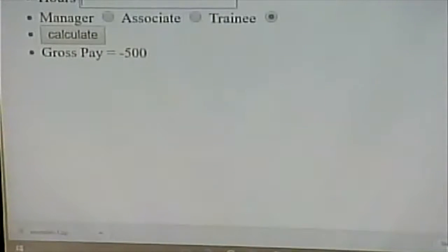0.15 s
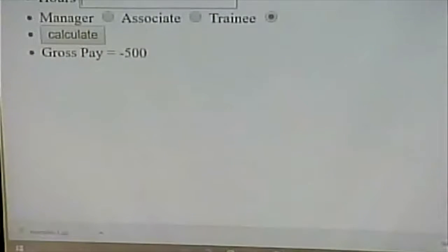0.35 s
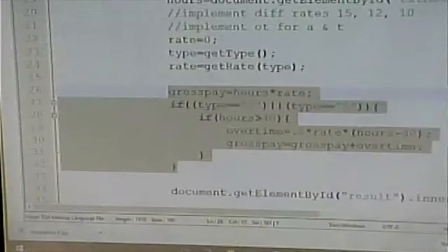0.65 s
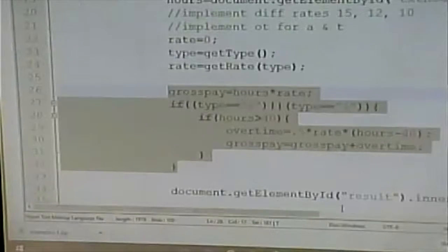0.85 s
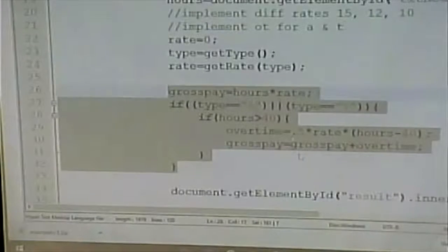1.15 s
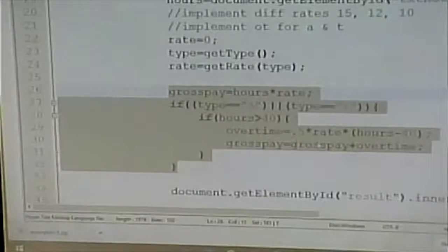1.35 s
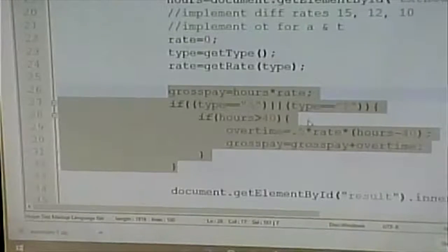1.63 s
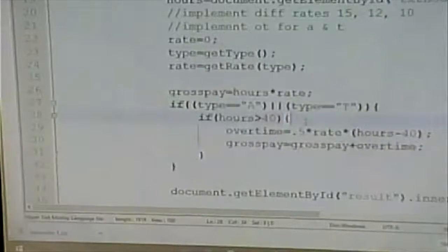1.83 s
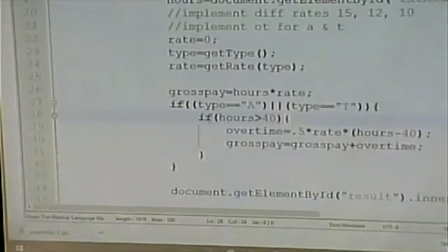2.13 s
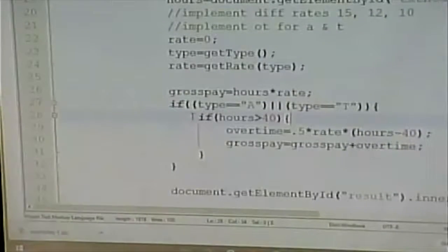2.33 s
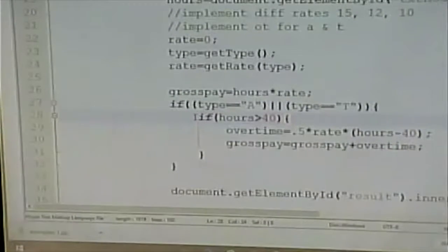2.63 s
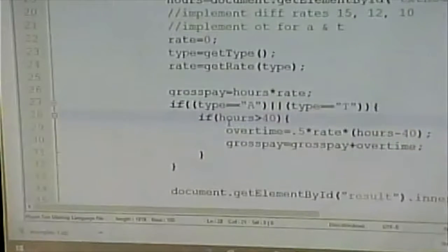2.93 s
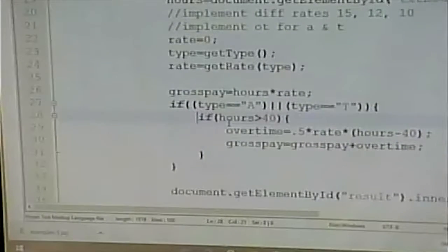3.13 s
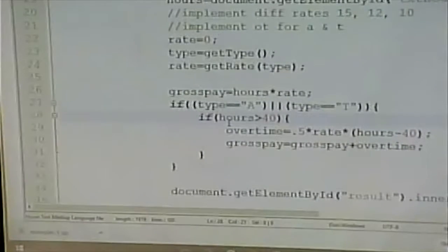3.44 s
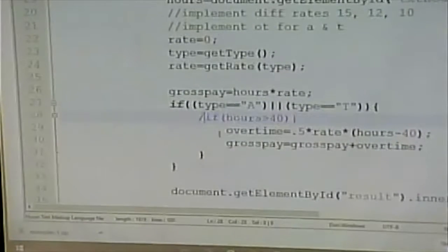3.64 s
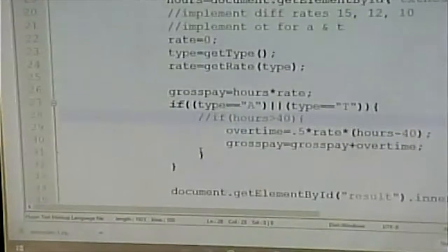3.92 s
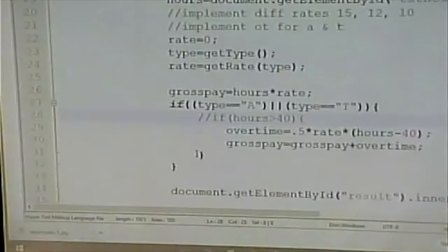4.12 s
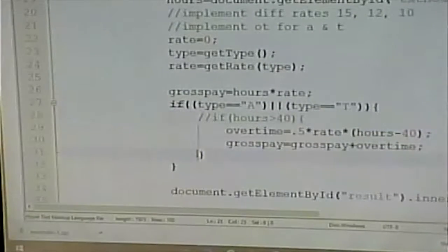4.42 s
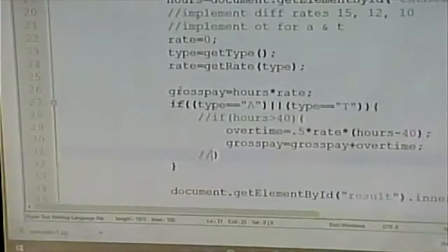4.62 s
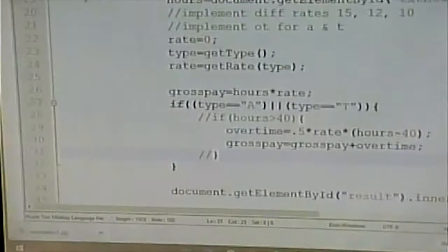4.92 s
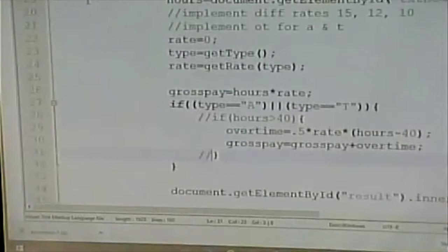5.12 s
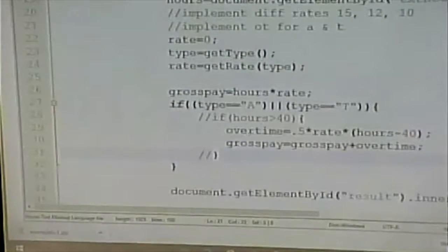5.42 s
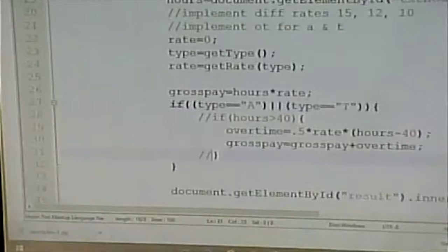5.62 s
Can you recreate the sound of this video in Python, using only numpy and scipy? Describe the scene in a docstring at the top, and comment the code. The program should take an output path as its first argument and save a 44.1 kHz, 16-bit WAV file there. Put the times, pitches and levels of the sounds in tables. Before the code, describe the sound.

Close, almost mono pickup at a desk in a small room with quiet fan noise and faint mains hum. Light knocks and separate mouse press-and-release clicks occupy the first half, with faint skin friction throughout. After a tiny rising squeak, loose plastic keys are tapped in a short burst, the mouse clicks again, and a second burst finishes with a hard, bright key hit.

```python
"""Someone works at a desk in a quiet room. Throughout, a hand slides over the desk (grainy friction noise)
under fan hiss, mains hum and microphone noise (shaped noise, phase-wandering tones). The hand bumps the desk
from the start and the mouse clicks now and then (struck modes); near 3 s a slide ends in a faint squeak (a
rising tone). Two bursts of key taps follow (struck modes with bounces and a loose rattle), the mouse clicking
once more between them. Near walls throw every tap, bump and click back before the room rings out."""
import sys
import numpy as np
from scipy import signal
from scipy.fft import rfft, irfft
from scipy.io import wavfile
from scipy.ndimage import uniform_filter1d

SR = 44100
rng = np.random.default_rng(int(sys.argv[2]) if len(sys.argv) > 2 else 0)


def put_to_file(sound):
    """Save the sound as 16-bit audio at rate SR, in the file named by the first command-line argument."""
    columns = np.atleast_2d(sound).T  # one column per channel
    safe = np.clip(columns, -1, 1)
    whole_steps = np.round(safe * 32767)
    wavfile.write(sys.argv[1], SR, whole_steps.astype(np.int16))


N = 254236  # samples


def gain_of(db):
    """Level law: a level in decibels becomes an amplitude factor."""
    return 10 ** (np.asarray(db) / 20)


def evened(x):
    """Normalisation to a root-mean-square amplitude of 1."""
    return x / np.sqrt(np.mean(x ** 2) + 1e-20)


def read(points, hz):
    """Interpolation of a table along a logarithmic frequency axis."""
    f, value = np.transpose(points)
    return np.interp(np.log(hz + 1), np.log(f + 1), value)


def add(mix, s, sound):
    """Superposition: a sound starting at s seconds adds to the mix."""
    part = mix[round(s * SR):][:len(sound)]
    part += sound[:len(part)]


def hiss(colour, patchy_db):
    """Shaped random noise: a spectral envelope with patches drifting in time and frequency, rms 1."""
    frames, hz = N // 512 + 5, np.fft.rfftfreq(2048, 1 / SR)
    real, imaginary, patches = rng.standard_normal((frames, 1025, 3)).T
    patches = uniform_filter1d(patches, size=30, axis=0)  # along frequency
    patches = evened(uniform_filter1d(patches, size=6, axis=1))  # along time
    envelope = gain_of(read(colour, hz)[:, None] + patchy_db * patches)
    noise = signal.istft((real + 1j * imaginary) * envelope, nperseg=2048, noverlap=1536)[1]
    return evened(noise[:N])


# Level of skin and mouse feet sliding over desk and keys. Each row: time in seconds, rms level in dB.
SLIDE_LEVEL = [(0.0, -57.5), (1.64, -54.5), (1.76, -52), (1.94, -57), (2.23, -56), (2.84, -53),
               (3.08, -58.5), (3.61, -54), (3.99, -58), (4.23, -59), (4.6, -49.5), (4.76, -58.5),
               (5.2, -56), (5.76, -59.5)]
# Spectral envelope of the friction. Each row: frequency in Hz, relative density in dB per Hz.
SLIDE_COLOUR = [(410, -56), (700, -17), (814, -19), (845, -22), (1090, -21), (1540, -10.5), (2010, -14.5),
                (4650, 0.5), (6850, -17.5), (9260, -17), (14000, -28)]


def slide():
    """Stick-slip friction: fine noise made grainy by random catches of the skin."""
    t = np.arange(N) / SR
    caught = rng.random(N) < 120. / SR  # about 120 catches a second
    catches = gain_of(2.0 * np.minimum(rng.exponential(1, N), 3.)) * caught
    catch_decay = np.exp(-np.arange(600) / 44.0)  # time constant 44 samples, about 1 ms
    grain = 1.4 + 0.17 * evened(signal.oaconvolve(catches, catch_decay)[:N])
    level_db = np.interp(t, *np.transpose(SLIDE_LEVEL))
    return gain_of(level_db) * evened(grain * hiss(SLIDE_COLOUR, 2.1))


# Spectral envelope of the fan hiss and background. Each row: frequency in Hz, relative density in dB per Hz.
AIR_COLOUR = [(12, -34), (20, 3), (70, -10.5), (234, -17), (277, -17.5), (310, -17), (607, -23),
              (1330, -26), (1440, -27), (1610, -28.5), (3070, -23.5), (4420, -19), (6540, -44.5),
              (14700, -36), (16000, -55)]
AIR_DB = -54  # rms level


def air():
    """Broadband noise: a steady hiss with a gently drifting spectrum."""
    return gain_of(AIR_DB) * hiss(AIR_COLOUR, 1.0)


# Mains hum and fan tones. Each row: frequency in Hz, rms level in dB, line width in Hz.
HUM_TONES = [(62.6, -63.5, 3.2), (835, -85, 7), (5390, -67.5, 11)]


def tones():
    """Phase diffusion: the phase of each steady tone wanders at random, which widens its spectral line."""
    t, out = np.arange(N) / SR, np.zeros(N)
    for hz, db, width in HUM_TONES:
        wander = np.cumsum(rng.standard_normal(N)) * np.sqrt(2 * np.pi * abs(width) / SR)
        out += np.sqrt(2) * gain_of(db) * np.sin(2 * np.pi * hz * t + wander)
    return out


# Spectral envelope of the noise between the channels. Each row: frequency in Hz, relative density in dB per Hz.
APART_COLOUR = [(12, -18), (20, -8), (82, -3), (1080, -16), (3180, -17), (4950, -13.5), (7100, -23),
                (9630, -21), (15000, -23.5)]
APART_DB = -71.5  # rms level


def channel_noise():
    """Antiphase noise: a flickering hiss, later added to one channel and taken from the other."""
    return gain_of(APART_DB) * hiss(APART_COLOUR, 6.1)


def contact(ms):
    """Impact force: one sharp hit, chatter with a time constant of ms and a weak, slower rattle."""
    t = np.arange(2500) / SR
    fading = np.exp(-1000 * t / max(ms, .05)) + gain_of(-14.0) * np.exp(-t / 0.0091)
    chatter = rng.standard_normal(len(t)) * fading * (rng.random(len(t)) < .25)
    force = chatter + 2.9 * (t == 0)
    spectrum = rfft(force, 2 * len(t))
    # hard contacts drive all pitches alike: even out the broad shape of the force spectrum
    broad_shape = np.sqrt(uniform_filter1d(abs(spectrum) ** 2, size=36))
    return irfft(spectrum / broad_shape)[:len(t)]


def ring(modes, blow, spread, pitch):
    """Modal excitation: a blow sets slightly detuned modes swelling briefly and dying; peak 1."""
    hz, width, db = np.transpose(modes)[:, :, None]
    t = np.arange(900) / SR
    detune = rng.uniform(-1, 1, (len(modes), 1))
    sign = (-1) ** np.arange(len(modes))[:, None]  # neighbours start opposed, so no holes open between them
    fade = 8.73 * width * t
    swing = sign * np.sin(2 * np.pi * hz * pitch * (1 + spread * detune) * t)
    response = (gain_of(db) * width * fade ** 2 * np.exp(-fade) * swing).sum(0)
    out = signal.fftconvolve(blow, response)
    return out / abs(out).max()


# Modes of desk, plastic deck and caps in five groups: boom, thud, lower ring, upper ring, tick.
# Each row: frequency in Hz before the pitch factor, nominal width in Hz, relative level in dB.
DESK_BOOM = [(395, 150, -11.5), (565, 59, -9), (825, 116, -2), (960, 64, 2), (1054, 180, -5.5),
             (1278, 124, 3)]
DECK_THUD = [(1424, 280, -6.5), (1932, 345, -0.5), (2105, 248, 4), (2470, 263, 3.5)]
LOWER_RING = [(2950, 580, -18), (3180, 200, -2.5), (3590, 304, 0.5), (3847, 280, 4)]
UPPER_RING = [(4305, 350, 2.5), (4930, 290, 0), (5390, 236, 3), (6000, 650, -11.5)]
TREBLE_TICK = [(7900, 280, -11), (8560, 180, 0.5), (9300, 500, 0.5), (10180, 940, -8), (11300, 450, -13.5),
               (11530, 290, -16), (12700, 1300, -11.5)]


def taps(rows):
    """Modal participation: every tap rings the same deck; where it lands sets each group's share."""
    out = np.zeros(N)
    for s, db, desk_db, thud_db, tick_db, upper_db, pitch, ms in rows:
        blow = contact(ms)
        lower = ring(LOWER_RING, blow, 0.038, pitch)
        upper = ring(UPPER_RING, blow, 0.038, pitch)
        cap = gain_of(-upper_db / 2) * lower + gain_of(upper_db / 2) * upper
        shares = ((desk_db, DESK_BOOM), (thud_db, DECK_THUD), (tick_db, TREBLE_TICK))
        rest = sum(gain_of(share_db) * ring(modes, blow, 0.033, 0.95) for share_db, modes in shares)
        add(out, s, gain_of(db) * (cap / abs(cap).max() + rest))
    return out


# A hand or the mouse knocking the desk and deck. Each row: start in seconds, peak level of the ring in dB,
# then desk boom, deck thud and treble tick in dB re that peak, upper ring in dB re lower ring,
# contact time constant in ms.
HAND_BUMPS = [(0.0478, -41, -22, -15, -19, 4, 8.6), (0.2796, -24, -20, -15, -18, 8.5, 13),
              (0.2977, -32.5, -16.5, -9, -19, 5, 60), (1.6106, -36, -7.5, -14, -26, 6, 1.8),
              (1.6201, -42, -7.5, -4, -27, -1, 27), (1.8018, -40, -26, -25, -22, 10, 20),
              (1.8947, -38, -18, -7, -21, 4, 36)]
BUMP_PITCH = 0.93  # factor on the ring frequencies


def bumps():
    """Prolonged impact: mostly longer contacts on the same desk and deck."""
    return taps([(*row[:-1], BUMP_PITCH, row[-1]) for row in HAND_BUMPS])


# First echoes off near walls. Each row: delay in ms, level in dB.
WALL_ECHOES = [(9.2, -19), (10.6, -21), (12.2, -22), (13.4, -15)]
# Late reverberation. Each row: frequency in Hz, decay time T60 in seconds, relative level in dB.
ROOM_DECAY = [(500, 0.46, 1), (1500, 0.36, -4), (3450, 0.23, -5), (4660, 0.13, 1), (9300, 0.1, 8),
              (14100, 0.04, -5)]
ROOM_DB, ROOM_START_MS = -12.5, 8.7  # energy level and onset of the late part


def room(x):
    """Early reflection and reverberation: single echoes, plus sparse random-sign taps dying band by band."""
    late = np.zeros(SR // 2)
    at = np.arange(round(ROOM_START_MS * SR / 1000), len(late) - 20, 20)
    late[at + rng.integers(0, 20, len(at))] = rng.choice([-1., 1.], len(at))
    hz, t, bands = signal.stft(late, SR, nperseg=128)
    t60, db = (read(np.array(ROOM_DECAY)[:, [0, column]], hz)[:, None] for column in (1, 2))
    late = signal.istft(bands * gain_of(db - 60 * t / t60), SR, nperseg=128)[1]
    answer = gain_of(ROOM_DB) * late / np.linalg.norm(late)
    for ms, echo_db in WALL_ECHOES:
        add(answer, ms / 1000, gain_of(echo_db) * np.array([1.]))
    return signal.fftconvolve(x, answer)[:N]


# Mouse switch snapping down, then up. Each row: start in seconds, peak level in dB.
MOUSE_PRESS = [(0.3682, -28.5), (1.5551, -27.5), (2.4319, -28.5), (4.142, -26.5)]
MOUSE_RELEASE = [(0.4953, -26), (1.6428, -26.5), (2.5297, -25), (4.2201, -24.5)]
# Modes of the switch and shell. Each row: frequency in Hz before the pitch factor, nominal width in Hz,
# relative level in dB when pressed, relative level in dB when released.
SWITCH_MODES = [(3910, 500, -11, -10), (4330, 300, -4.5, 6), (5530, 550, -3, -3.5), (6650, 330, -7, -5),
                (8050, 220, -8, -13.5), (9170, 780, -14, -10), (10260, 1300, -15, -11),
                (13070, 240, -13, -3.5), (14200, 320, -13, -17), (14700, 860, -36, -33)]


def mouse():
    """Snap-through: the switch dome chatters briefly; press and release weight the modes differently."""
    out, modes = np.zeros(N), np.array(SWITCH_MODES)
    for clicks, columns in ((MOUSE_PRESS, [0, 1, 2]), (MOUSE_RELEASE, [0, 1, 3])):
        for s, db in clicks:
            add(out, s, gain_of(db) * ring(modes[:, columns], contact(2.02), 0.0057, 0.96))
    return out


SQUEAK_AT_S, SQUEAK_S = 2.96, 0.089  # start and duration
SQUEAK_HZ, SQUEAK_RISE_HZ, SQUEAK_DB = 3600, 230, -54.5  # first pitch, rise, amplitude before flutter


def squeak():
    """Amplitude modulation: slow noise swings the height of a thin, rising tone as a slide ends."""
    t = np.arange(0, SQUEAK_S, 1 / SR)
    hz = SQUEAK_HZ + SQUEAK_RISE_HZ * t / SQUEAK_S
    swell = np.sin(np.pi * t / SQUEAK_S)
    slow_noise = uniform_filter1d(uniform_filter1d(rng.standard_normal(len(t)), size=90), size=90)
    flutter = 1.1 + 0.9 * evened(slow_noise)
    return SQUEAK_AT_S, gain_of(SQUEAK_DB) * swell * flutter * np.sin(2 * np.pi * np.cumsum(hz) / SR)


# Key strokes, a cap going down or springing back. Each row: start in seconds, peak level of the ring in dB,
# then desk boom, deck thud and treble tick in dB re that peak, cap pitch as a factor, loose rattle in dB re
# peak, upper ring in dB re lower ring; then for the second contact and again for the late bounce:
# delay in ms, level in dB re peak, upper ring in dB re lower ring.
KEY_STROKES = [(3.3718, -21.5, -44, -18, -24, 0.95, -17, 22, 1.82, 14.5, -4.5, 13.6, -15, 12),
               (3.4737, -28, -42, -19.5, -22, 0.97, -8, 1, 1.6, 11, -8, 16.5, 7, -3),
               (3.5411, -17, -33.5, -16.5, -24.5, 0.93, -21, -18, 2.4, 0, 2.5, 16.6, -5, 6),
               (3.6333, -28, -36, -14, -12, 0.94, -4, -1, 15.1, 1, 4, 20.5, 4, -7),
               (4.2812, -20.5, -38, -17.5, -24, 0.92, -15.5, 11, 1.1, 6.5, -15, 20, -8, 8),
               (4.3753, -19, -36, -17.5, -18.5, 0.94, -12, -6, 3.24, 0, 4.5, 7, -3, -13),
               (4.4448, -15, -41, -15, -25.5, 0.96, -20, -20, 4.2, -4.5, 16, 15, -25, -2),
               (4.5422, -17.5, -35, -16.5, -16.5, 0.93, -13, -8, 3, -0.5, 0, 7.2, 1.1, 0.5),
               (4.675, -29, -40, -17, -15, 1.0, -19.5, 7, 3, -17, 5, 13, -20, 5),
               (4.8025, -39, -30, -24, -24, 1.0, -17, 9, 3, -18, 5, 12, -16, 5),
               (4.9877, -21, -21, -15.5, -20.5, 1, -14, 11, 1.24, 1.5, 4, 11, -2, -5),
               (5.0355, -19.5, -25, -16, -20, 0.96, -10, 5, 1.9, -6, 14, 15.5, -1, 2),
               (5.0777, -6.5, -24, -15.5, -17, 1.0, -31, 10, 1.45, -3.5, -11, 22.6, -16, 3)]
KEY_CONTACT_MS, RATTLE_CONTACT_MS = 0.87, 1.5  # time constants
RATTLE_GAP_MS, RATTLE_FADE_DB_PER_S, RATTLE_SCATTER_DB = 13, 104, 3  # mean gap, decay, random +-
RATTLE_UPPER_DB, RATTLE_DECK_DB = 4.5, -4  # mean upper re lower ring, change in the boom, thud and tick shares


def keys():
    """Repeated impact: a touch, a second contact, a late bounce and a fading rattle of the loose cap."""
    rows, chance = [], rng.random((len(KEY_STROKES), 10, 3))  # ten rattle hits a stroke
    for stroke, luck in zip(KEY_STROKES, chance):
        s, db, desk_db, thud_db, tick_db, pitch, rattle_db, *contacts = stroke
        firm = np.reshape([0, 0, *contacts], (3, 3))
        after = np.cumsum(RATTLE_GAP_MS / 1000 * (.5 + luck[:, 0]))  # seconds after the late bounce
        scatter_db = RATTLE_SCATTER_DB * (2 * luck[:, 1] - 1)
        loose_db = db + rattle_db - RATTLE_FADE_DB_PER_S * after + scatter_db
        lean_db = RATTLE_UPPER_DB + 7.0 * (2 * luck[:, 2] - 1)
        shares_db = np.array([desk_db, thud_db, tick_db])
        for ms, more_db, upper_db in firm:
            rows.append((s + ms / 1000, db + more_db, *shares_db, upper_db, pitch, KEY_CONTACT_MS))
        bounce_s = s + firm[-1, 0] / 1000
        for lag, weak_db, upper_db in zip(after, loose_db, lean_db):
            rows.append((bounce_s + lag, weak_db, *(shares_db + RATTLE_DECK_DB), upper_db, pitch,
                         RATTLE_CONTACT_MS))
    return taps(rows)


def scene():
    """Superposition at one capsule; the two channels differ only by a little flickering noise."""
    steady = slide() + air() + tones()
    side = channel_noise()
    desk = bumps() + mouse() + keys()
    add(steady, *squeak())
    mid = desk + room(desk) + steady
    return np.array([mid + side, mid - side])


EDGE_HZ = 15170


def record(dry):
    """Band limitation: a low-pass filter removes what lies above the edge."""
    low_pass = signal.firwin(511, EDGE_HZ, window=("kaiser", 9), fs=SR)
    return signal.oaconvolve(dry, low_pass[None], "same")


dry = scene()
out = record(dry)
put_to_file(out)
```